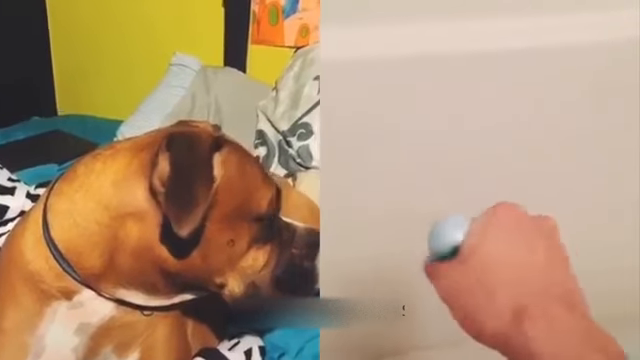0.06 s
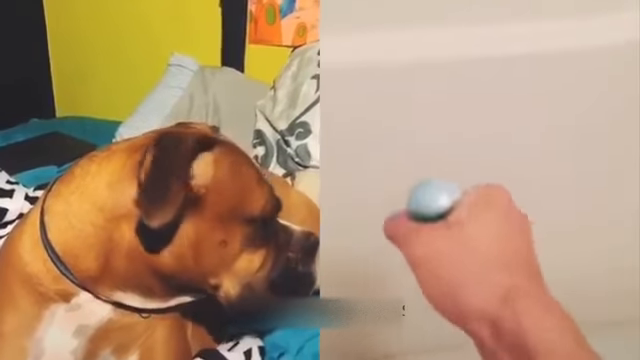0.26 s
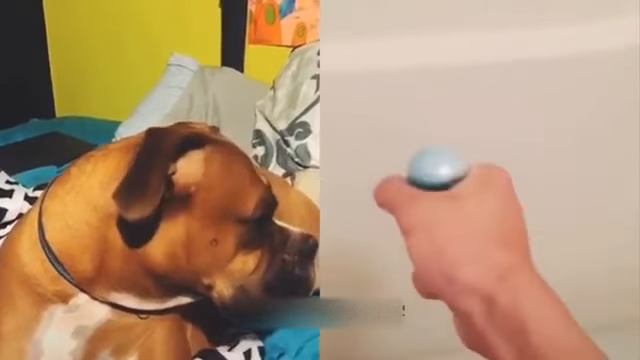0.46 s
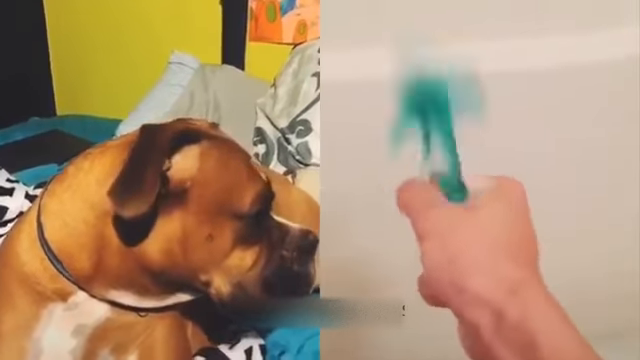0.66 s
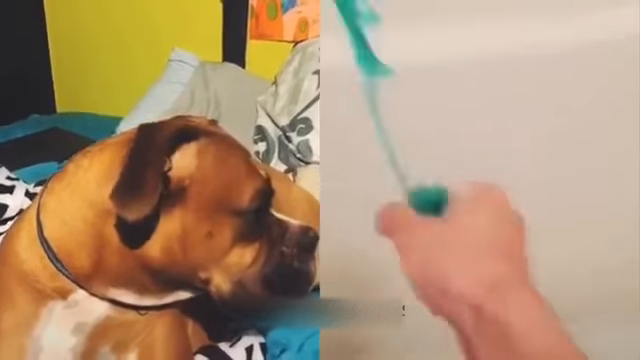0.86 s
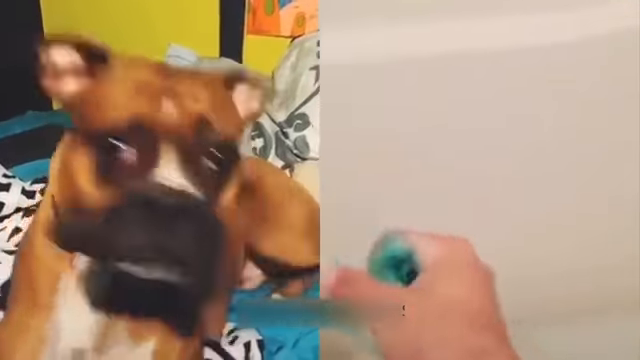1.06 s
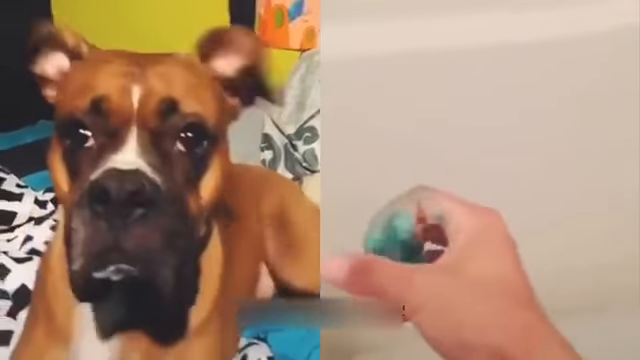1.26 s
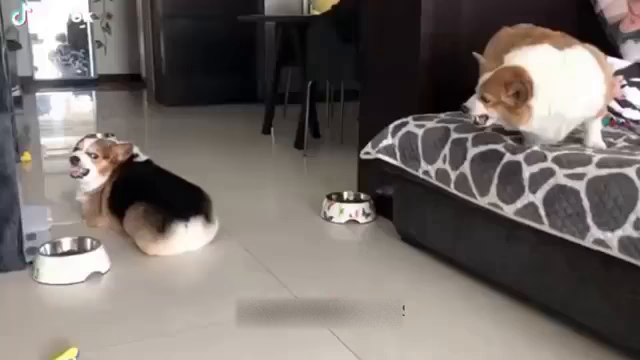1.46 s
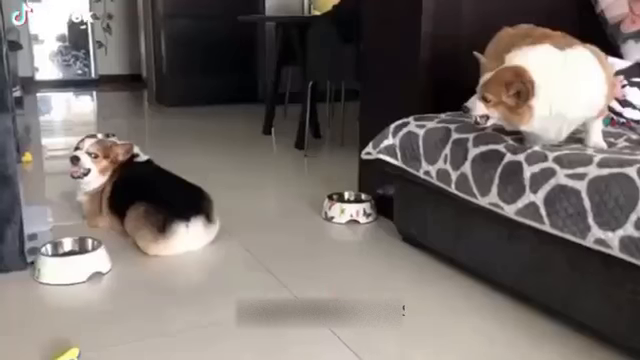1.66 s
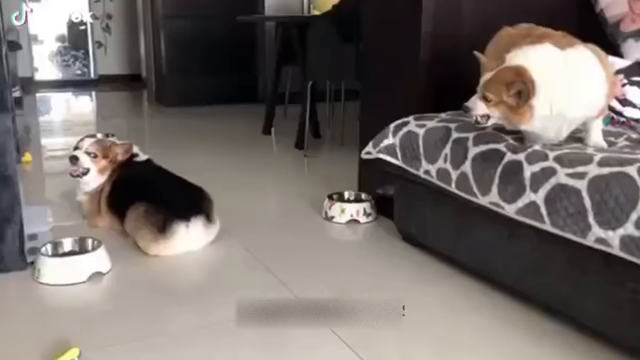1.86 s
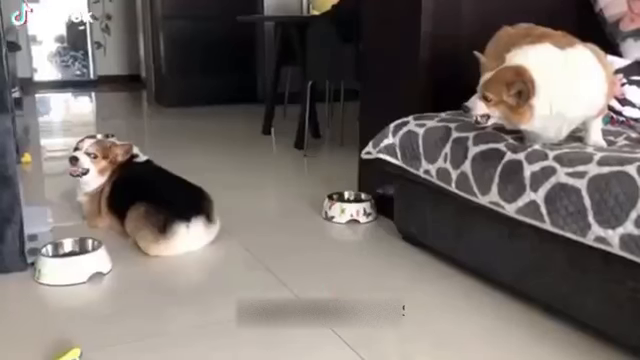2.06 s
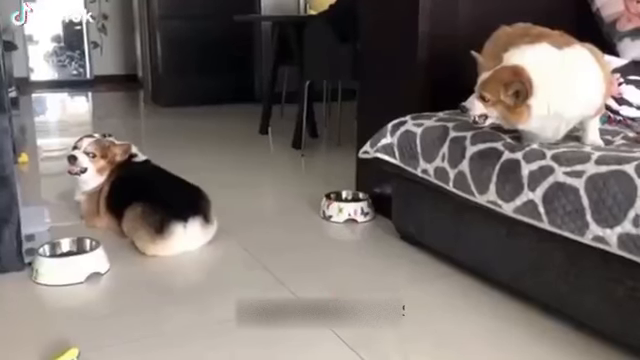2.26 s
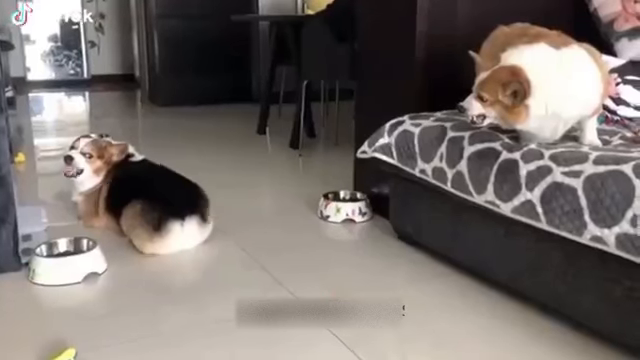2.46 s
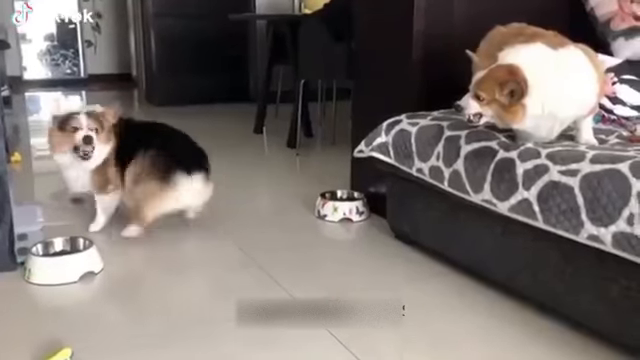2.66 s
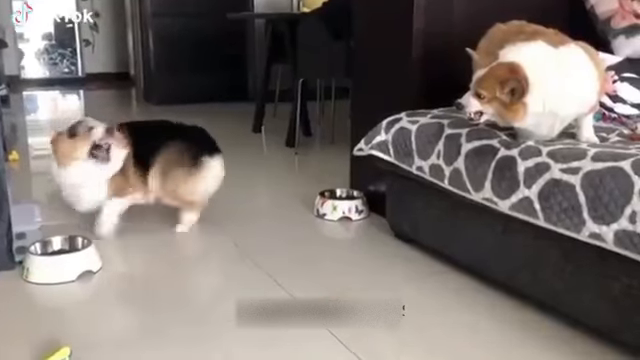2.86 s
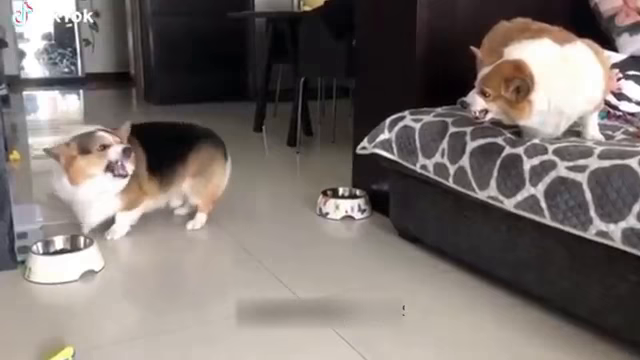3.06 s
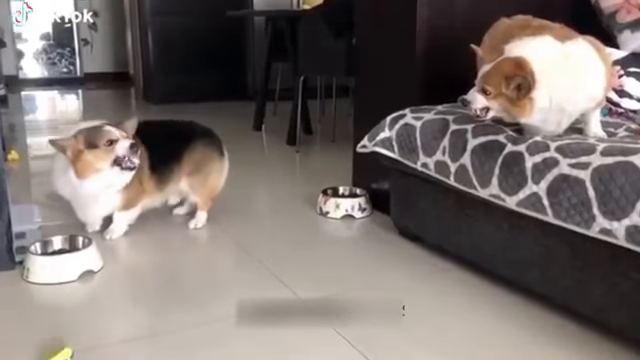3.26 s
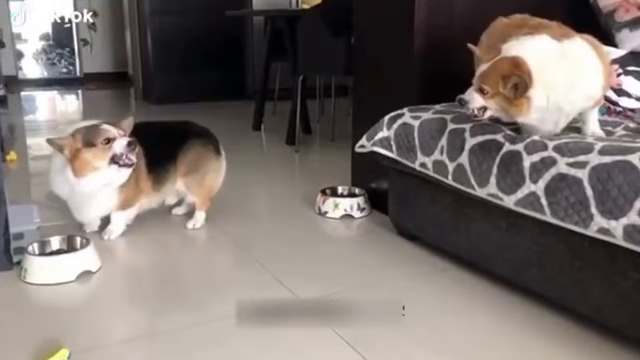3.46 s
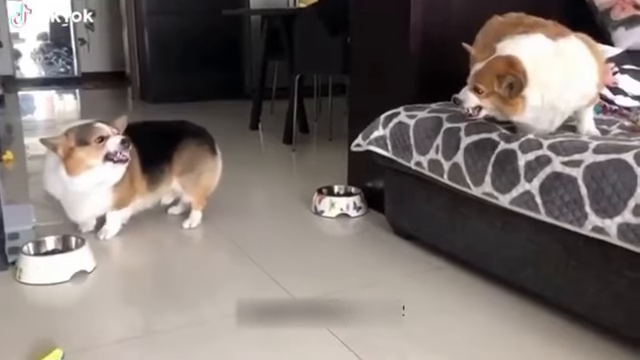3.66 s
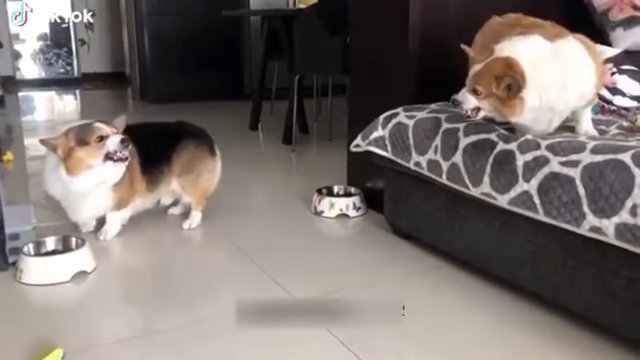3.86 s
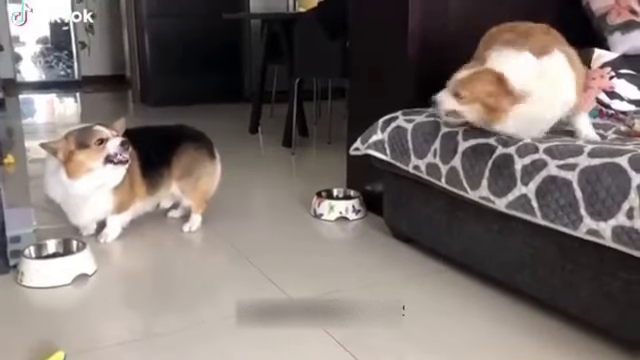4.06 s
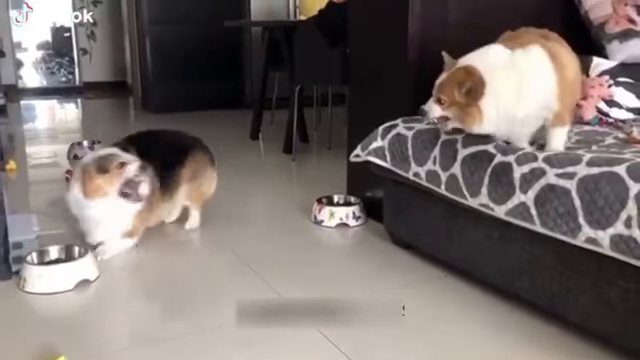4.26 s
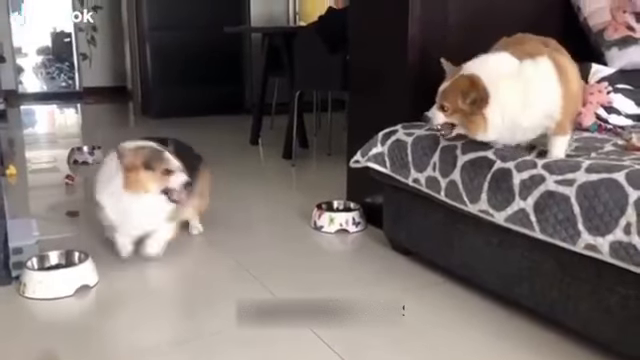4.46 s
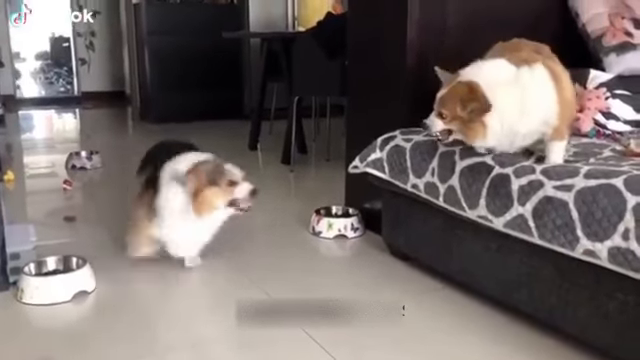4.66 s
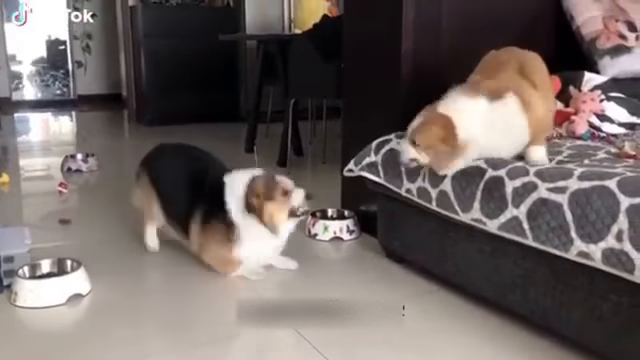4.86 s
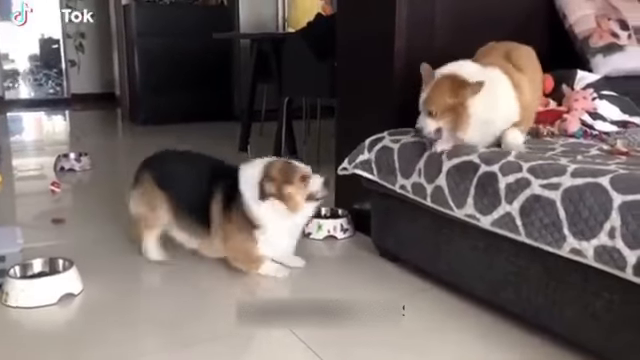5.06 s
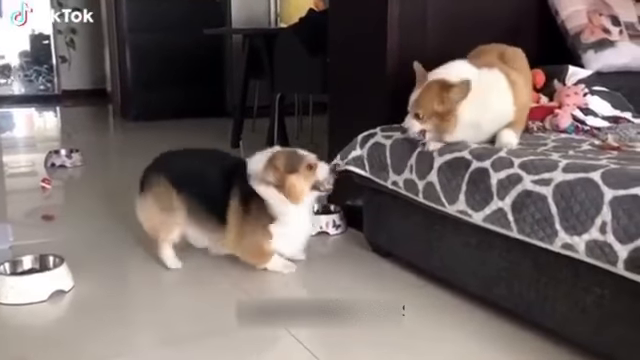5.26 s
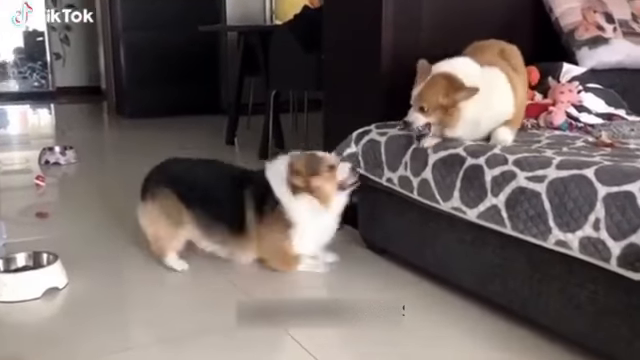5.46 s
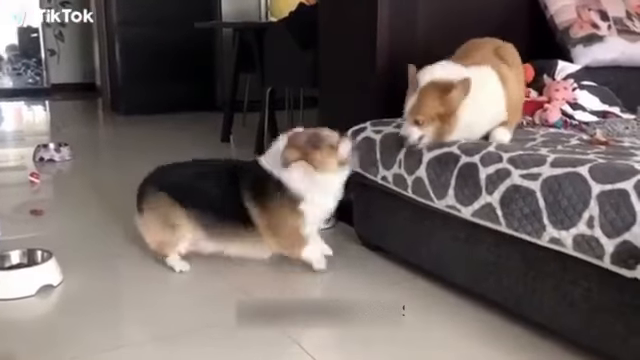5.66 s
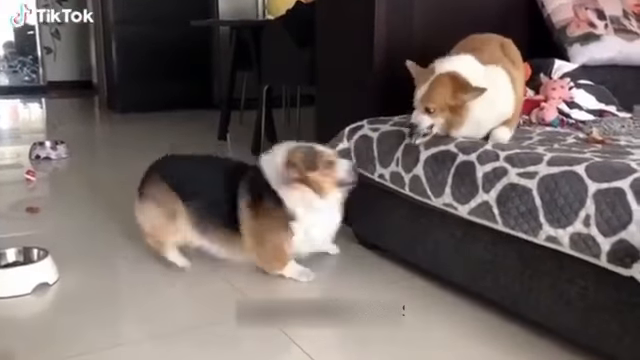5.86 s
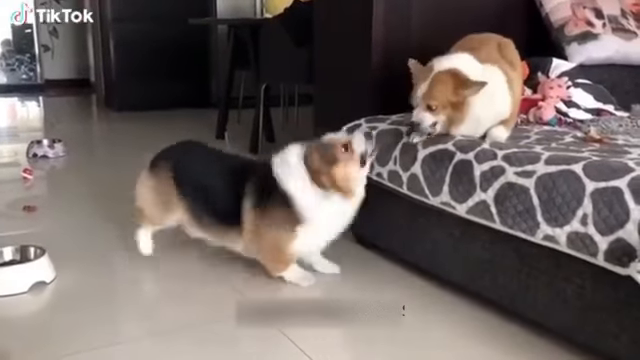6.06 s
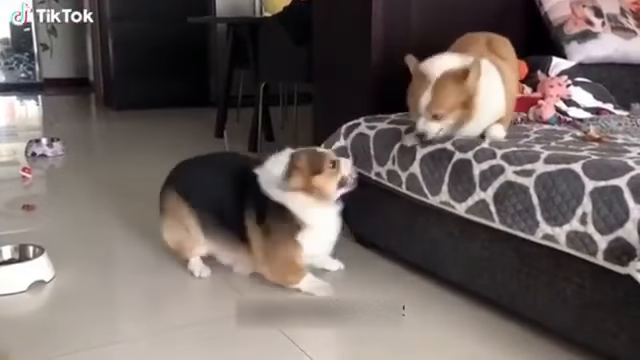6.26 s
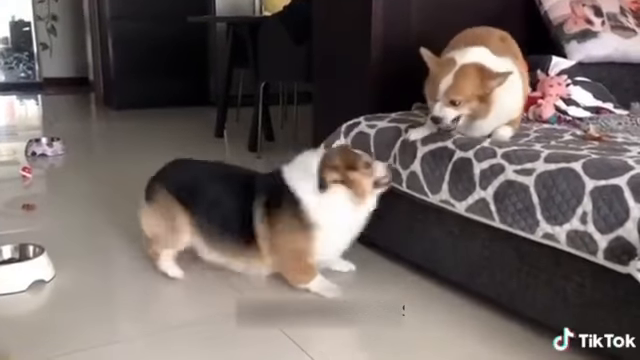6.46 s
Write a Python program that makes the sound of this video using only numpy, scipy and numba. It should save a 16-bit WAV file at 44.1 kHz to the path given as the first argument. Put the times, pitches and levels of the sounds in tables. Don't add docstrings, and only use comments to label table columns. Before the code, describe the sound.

Quiet room tone, a sharp rubbery pop, a brief silence, then steady throbbing growls with bursts of rough, quick barking between two small dogs indoors.

```python
import sys
import numpy as np
from scipy import signal
from scipy.fft import rfft, irfft
from scipy.io import wavfile
from scipy.ndimage import uniform_filter1d
from numba import njit

SR = 44100
rng = np.random.default_rng(int(sys.argv[2]) if len(sys.argv) > 2 else 0)


def ratio(d):
    e = np.asarray(d, float) / 20
    return 10 ** e


def transcribe(signal):
    frames = np.atleast_2d(signal).T
    limited = np.clip(frames, -1, 1)
    pcm = np.round(limited * 32767).astype(np.int16)
    wavfile.write(sys.argv[1], SR, pcm)


N = 287091
T = np.arange(N) / SR
POP_S = .9325


def noise():
    return rng.standard_normal(N)


def even(x, span_s=0.049):
    size = int(span_s * SR)
    power = uniform_filter1d(uniform_filter1d(x ** 2, size), size)
    return x / np.sqrt(power + 1e-12)


@njit
def svf(x, hz, width):
    y, band, low = np.empty(len(x)), 0., 0.
    for i in range(len(x)):
        g, k = np.tan(np.pi * hz[i] / SR), width / hz[i]
        v = (band + g * (x[i] - low)) / (1 + g * (g + k))
        band, low, y[i] = 2 * v - band, low + 2 * g * v, k * v
    return y


def ring(x, hz, width):
    hz = np.clip(hz + np.zeros(N), 10, .45 * SR)
    width = float(width)
    return svf(svf(x, hz, width), hz, width)


def modes(x, table):
    total = np.zeros(N)
    for k, (hz, width, db) in enumerate(table):
        total += (-1) ** k * ratio(db) * ring(x, hz, width) / np.sqrt(width)
    return even(total)


def colour(table):
    hz, db = np.transpose(table)
    bins = np.arange(N // 2 + 1) * SR / N + 1
    gain = ratio(np.interp(np.log(bins), np.log(hz), db))
    x = irfft(rfft(noise()) * gain, N)
    return x / x.std()


def fade(start_s, rise_s, t60_s):
    t = np.maximum(T - start_s, 0)
    return (1 - np.exp(-t / rise_s)) * np.exp(-np.log(1000) * t / t60_s)


def bedroom():
    # (frequency [Hz], level [dB])
    still_air = [(15, -22.5), (25, -6.5), (98, -3.5), (203, -8.5), (231, -14), (349, -6), (584, -16),
                 (665, -7.5), (2130, -18.5), (3380, -30), (12000, -55), (15600, -97.5), (22000, -120)]
    # (frequency [Hz], width [Hz], level [dB])
    ducts = [(354, 6.9, -8.5), (912, 92, -6), (1200, 47, -9.5), (2070, 51, -8.5), (2690, 72, -19.5),
             (2900, 37, -32)]
    # (resting gain [dB], dip [dB], recovery [s])
    ducking = [
        (6, -35, 0.52),
        (-5, -24, 0.164),
    ]
    t = np.maximum(T - POP_S, 0)
    low, high = (ratio(db + dip_db * np.minimum(t / .06, 1) * np.exp(-t / back_s))
                 for db, dip_db, back_s in ducking)
    tone = ratio(-42) * (colour(still_air) + ratio(-5.5) * modes(noise(), ducts))
    bass = signal.sosfilt(signal.butter(1, 300, fs=SR, output="sos"), tone)
    return low * bass + high * (tone - bass)


def toy():
    # (frequency [Hz], level [dB])
    tearing = [(180, -44), (300, -38), (475, -24), (629, -15), (917, -10), (1030, -15.5), (1250, -9.5),
               (1860, -11), (4090, -0.5), (5980, -13), (12300, -18.5), (15200, -41.5)]
    creak = ratio(-37.0) * colour(tearing) * (T > .911) * (T < POP_S)
    whistle = ratio(-23.5) * even(ring(noise(), 3100, 300))
    whistle *= np.clip((T - .918) / 0.011, 0, 1) * (T < POP_S + .002)

    t = np.maximum(T - POP_S, 0)
    swing = -np.sin(2 * np.pi * (58 * t + 1.176 * (1 - np.exp(-t / 0.0029))))
    thump = ratio(10.0) * swing * fade(POP_S, 0.0064, 0.085)
    kick = ratio(-1.5) * np.sin(2 * np.pi * 175 * t) * fade(POP_S, 0.00067, 0.069)

    spray = ratio(-1.5) * colour(tearing)
    body = signal.sosfiltfilt(signal.butter(4, 6600, fs=SR, output="sos"), spray)
    spray = body * fade(POP_S, 0.00043, 0.24) + (spray - body) * fade(POP_S, .001, 0.16)
    tail = ratio(-29.5) * even(ring(noise(), 4070, 2400), .1)
    tail *= fade(POP_S, .05, 0.81) * np.clip((1.36 - T) / 0.11, 0, 1)

    rustle = ratio(-51.5) * even(ring(noise(), 5300, 6600), 0.085) * (T > 1.415)
    return creak + whistle + thump + kick + spray + tail + rustle


@njit
def folds(hz, rough, chance, jitter, shimmer):
    pulses, phase, p, k = np.zeros(len(hz) + 1), np.empty(len(hz)), 0., 0
    for i in range(len(hz)):
        step = hz[i] * np.exp(jitter * rough[i] * chance[k, 0]) / SR
        p += step
        if p >= 1:
            p, k = p - 1, k + 1
            size = np.exp(shimmer * rough[i] * chance[k, 1])
            pulses[i] += size * p / step
            pulses[i + 1] += size * (1 - p / step)
        phase[i] = p
    return pulses[:-1], phase


def voice(hz, rough, jitter, shimmer, air, second):
    stumble = np.exp(.05 * rough * even(ring(noise(), 25, 60), .3))
    pulses, phase = folds(hz * stumble, rough, rng.standard_normal((N // 40, 2)), jitter, shimmer)
    apart = 1.05 + .025 * even(ring(noise(), 12, 20), .3)
    other, _ = folds(hz * apart, rough, rng.standard_normal((N // 40, 2)), jitter, shimmer)
    steady_flow = (1 + second * apart) * hz / SR
    puff = np.exp(-phase) * noise()
    return even(pulses + second * other - steady_flow) + air * rough * even(puff)


def growl():
    # (time [s], chest level [dB], snarl [dB], teeth resonance [Hz])
    course = [(1.58, -38.5, 3.5, 2200), (1.65, -31, -2, 2230), (1.69, -36.5, 8.5, 2360),
              (1.76, -33, 0, 2400), (2.02, -33.5, -2.5, 2000), (2.09, -31.5, 4, 1870),
              (2.25, -33, 1.5, 2020), (2.5, -35.5, 3.5, 1900), (3.1, -40.5, 5, 2040),
              (3.59, -42.5, 3.5, 1850), (3.651, -36.5, 7, 1800), (3.8, -41, 6.5, 1950),
              (4.24, -32, 1, 1950), (4.55, -39, 14.5, 1960), (5.149, -35.5, 5, 1960), (5.4, -31, 4, 1970),
              (6.0, -33, 3.5, 1952), (6.51, -35, 0, 1951)]
    # (frequency [Hz], width [Hz], level [dB])
    chest_modes = [(115, 95, 0), (200, 102, 0), (285, 59, -2)]
    # (frequency [Hz], width [Hz], level [dB])
    throat_modes = [(500, 330, -3), (723, 210, -1), (920, 590, -1.5)]
    # (frequency [Hz], width [Hz], level [dB])
    hiss_modes = [(3220, 1000, -1.5), (4230, 2200, -10), (5600, 870, -4), (6920, 1200, -8.5)]
    time_s, *columns = np.transpose(course)
    db, snarl_db, teeth_hz = (np.interp(T, time_s, column) for column in columns)

    source = voice(np.full(N, 96.), np.ones(N), jitter=.25, shimmer=.45, air=.8, second=.3)
    air = noise()
    throb = ratio(0.67 * even(ring(noise(), 19.7, 6.1), 0.38))
    chest = throb * modes(source, chest_modes)
    throat = ratio(-7 + 0.98 * snarl_db) * throb * modes(air + .6 * source, throat_modes)
    teeth = even(ring(air, teeth_hz, 680) + 0.26 * ring(air, 2580, 1200), .1)
    teeth *= ratio(-15 + 1.18 * snarl_db)
    hiss = ratio(-24.5 + 1.13 * snarl_db) * modes(air, hiss_modes)
    return ratio(db - 1.5) * (chest + throat + teeth + hiss)


def pushes(table, fall_db_s, rise_db_s=1600.5):
    slur_s, foot_db, foot_db_s = .012, -16.5, 450.5
    start_s, hold_s, peak_db, *columns = np.transpose(table)
    level = np.full(N, -70.)
    for start, hold, peak in zip(start_s, hold_s, peak_db):
        foot = foot_db_s * np.abs(start - T) - foot_db
        attack = np.clip(rise_db_s * (start - T), 0, foot)
        release = np.maximum(fall_db_s * (T - start - hold), 0)
        level = np.maximum(level, peak - attack - release)
    row = np.clip(np.searchsorted(start_s - slur_s, T) - 1, 0, None)
    age = np.clip(T - start_s[row], 0, .15)

    def slur(x):
        return uniform_filter1d(x, int(slur_s * SR))

    return level, slur(age), [slur(column[row]) for column in columns]


def barks():
    # (full strength [s], hold [s], level [dB], fold pitch [Hz], throat resonance [Hz])
    throat_pushes = [(2.533, .085, -7, 854.5, 775), (2.63, .095, -9, 285, 657),
                     (2.815, 0.022, -17.5, 319, 907), (2.85, 0.038, -16, 455.7, 857),
                     (2.92, .06, -12, 271, 805), (4.066, .028, -3, 516.2, 1016),
                     (4.112, .035, -7.5, 354.6, 770), (4.293, 0.12, -11, 770, 740),
                     (4.41, .05, -7, 304.9, 763), (4.76, .08, -30.5, 229.6, 852),
                     (4.872, .016, -0.5, 536.3, 1070), (4.908, .012, -10, 548, 1000),
                     (4.96, .09, -25, 399.6, 920), (5.25, 0.05, -16.5, 398.2, 1082),
                     (5.305, 0.119, -24, 456, 750), (5.472, 0.039, -19, 419, 930),
                     (5.617, .008, -5, 525.4, 1010), (5.648, .06, -19, 300.9, 800),
                     (5.772, .25, -28.5, 250.6, 730), (6.075, .04, -11, 460, 916),
                     (6.158, 0.0073, -12, 456.2, 936), (6.2, 0.088, -22, 330, 890),
                     (6.36, .02, -28.5, 281.7, 900), (6.465, .05, -25, 263, 930)]
    # (full strength [s], hold [s], level [dB], mouth resonance [Hz])
    gapes = [(2.54, 0.029, -7, 1810), (2.575, 0.13, -9, 1482), (2.73, 0.063, -23, 1280),
             (2.843, .012, -4.5, 1500), (2.868, .012, -5, 1400), (2.9, 0.012, -7, 1380),
             (2.96, 0.017, -29.5, 1416), (4.065, 0.028, -13, 1200), (4.112, 0.023, -9, 1470),
             (4.16, 0.052, -24, 1348), (4.305, .045, -4.5, 1500), (4.37, 0.086, -10, 1577),
             (4.84, 0.019, -26, 1547), (4.875, .02, -9.5, 1257), (4.928, 0.017, -11, 1464),
             (4.97, 0.11, -24, 1530), (5.25, .015, -4, 1400), (5.285, .01, -9, 1550),
             (5.31, .025, -16, 1830), (5.455, .015, -10, 1600), (5.5, .04, -19, 1890),
             (5.614, .012, -17, 1257), (5.66, 0.039, -21, 1702), (5.785, 0.077, -23, 1690),
             (6.057, .023, -2, 1358), (6.118, .038, -6, 2000), (6.17, 0.028, -15.5, 1593),
             (6.22, .08, -20.5, 1750), (6.46, 0.036, -30.5, 1840)]
    # (time [s], hold [s], level [dB], pitch [Hz])
    wheezes = [
        (2.826, 0.0074, -24, 3500),
        (4.31, .01, -24.5, 3220),
        (5.465, .01, -21, 2450),
        (5.772, .028, -24, 3450),
        (5.858, 0.0074, -34, 3750),
        (6.455, .01, -32, 2499),
    ]
    # (time [s], hold [s], level [dB], rasp resonance [Hz])
    rasps = [(2.535, .06, -20.5, 3020), (2.63, 0.076, -27.5, 3020), (2.77, 0.044, -33.5, 2960),
             (2.845, 0.022, -27, 3470), (2.91, .01, -33.5, 3640), (2.98, 0.042, -46.5, 3900),
             (3.13, .25, -52, 3820), (4.06, 0.024, -24, 2990), (4.115, .02, -25, 2900),
             (4.17, 0.07, -36, 2970), (4.29, 0.053, -21, 3490), (4.38, 0.078, -27.5, 3640),
             (4.56, 0.12, -42, 3600), (4.84, .01, -28.5, 3820), (4.87, 0.069, -26, 3300),
             (4.98, .12, -31.5, 3540), (5.17, .05, -34, 3570), (5.255, 0.015, -21.5, 3046),
             (5.3, .05, -27.5, 3260), (5.47, 0.036, -26, 2900), (5.628, .005, -24.5, 3600),
             (5.66, 0.033, -29.5, 3804), (5.78, 0.085, -28, 3530), (5.93, .005, -34, 3610),
             (6.03, 0.0051, -35, 3600), (6.06, 0.075, -23, 3230), (6.15, 0.13, -27, 3110),
             (6.29, .04, -34, 3096), (6.445, .06, -34.5, 3050)]
    # (frequency [Hz], width [Hz], level [dB])
    teeth_modes = [(2864, 1040, 2), (4350, 3400, -2.5), (6310, 3000, 1.5)]
    # (from [s], added roughness [share])
    hoarseness = [(2.53, 0.19), (2.84, -.2), (2.918, -.25), (4.06, 0.043), (4.11, .2), (4.3, -0.0021),
                  (4.41, 0.19), (4.87, -0.0083), (5.25, 0), (5.31, .2), (5.46, 0.16), (5.62, 0),
                  (6.05, 0.091), (6.11, -0.097), (6.22, 0.046)]
    # (time [s], hold [s], level [dB])
    grunts = [
        (2.54, 0.014, -21),
        (2.68, 0.031, -30),
        (2.87, 0.05, -24),
        (4.12, 0.046, -17.5),
        (4.42, 0.028, -28),
        (5.3, 0.029, -20),
        (5.5, .04, -20.5),
        (5.67, 0.033, -21),
        (6.15, 0.012, -15.5),
        (6.285, 0.016, -16),
    ]
    db, age, (hz, throat_hz) = pushes(throat_pushes, 800)
    mouth_db, open_s, (mouth_hz,) = pushes(gapes, 799.5)
    wheeze_db, _, (wheeze_hz,) = pushes(wheezes, 1198)
    rasp_db, _, (rasp_hz,) = pushes(rasps, 295.5, 600)
    grunt_db, _, _ = pushes(grunts, 400)

    effort = np.maximum(db, mouth_db)
    from_s, added = np.transpose(hoarseness)
    hoarse = added[np.clip(np.searchsorted(from_s, T) - 1, 0, None)]
    rough = np.clip(.75 - .013 * (effort + 35) + hoarse, .1, .9)
    hz = hz * (1 - .5 * age)
    throat_hz = throat_hz * (1 - 0.38 * age)
    mouth_hz = mouth_hz * (1 + .3 * open_s)
    source = voice(hz, rough, jitter=.2, shimmer=.9, air=.8, second=.6)
    air = source + 1.95 * noise()

    awake = np.clip((effort + 60) / 15, 0, 1)
    chest_gain = awake * ratio(-23.5 + 0.67 * effort) + ratio(grunt_db - 6)
    chest = chest_gain * even(ring(source + .5 * air, 340, 460))
    throat = ring(source, throat_hz, 370) + 1.84 * rough ** 2 * ring(source, 0.82 * throat_hz, 545)
    mouth = ring(source, mouth_hz, 350) + 0.66 * ring(source, mouth_hz, 1100)
    mouth -= 0.42 * ring(source, 2390, 1001)
    muzzle = signal.ellip(3, 1, 30, (415, 2840), "bandpass", fs=SR, output="sos")
    tone = signal.sosfilt(muzzle, ratio(db) * even(throat) - ratio(mouth_db) * even(mouth))

    patches_db = 2.5 * even(ring(noise(), 45, 60), .3)
    rasp = 0.66 * even(ring(air, rasp_hz, 700)) + 1.095 * modes(air, teeth_modes)
    rasp *= ratio(rasp_db - 3 + patches_db)
    wheeze = ratio(wheeze_db) * even(ring(air, wheeze_hz, 700))
    flutter = ratio(1.9 * even(ring(noise(), 35.86, 14.0), 0.43))
    return flutter * (tone + rasp + wheeze) - chest


def snaps():
    # (time [s], peak level [dB], pitch [Hz])
    knocks = [
        (4.835, -9, 1175),
        (5.22, 5.5, 1400),
        (5.458, -15, 1651),
    ]
    return sum(ratio(db) * np.sin(2 * np.pi * hz * (T - s)) * fade(s, 0.0008, .013) for s, db, hz in knocks)


def echoes(x):
    # (delay [s], level [dB])
    reflections = [(.0031, -9.5), (.0074, -7), (.0127, -6), (.0193, -10)]
    out = x.copy()
    for k, (delay_s, db) in enumerate(reflections):
        out += (-1) ** k * ratio(db) * np.roll(x, int(delay_s * SR))
    return out


@njit
def walls(x, lags, gain, damp):
    line, soft, out = np.zeros((8, 4096)), np.zeros(8), np.zeros(len(x))
    for i in range(len(x)):
        total = 0.
        for k in range(8):
            soft[k] += (1 - damp) * (gain[k] * line[k, (i - lags[k]) & 4095] - soft[k])
            total += soft[k]
            out[i] += soft[k] * (1 - 2 * (k % 2))
        for k in range(8):
            line[k, i & 4095] = x[i] + soft[k] - total / 4
    return out


def tiled_room():
    dogs = barks() + snaps()
    lags = np.array([487, 631, 797, 983, 1153, 1327, 1549, 1801])
    t60_s = 0.6
    reverb = walls(dogs, lags, ratio(-60 * lags / SR / t60_s), 0.071)
    mix = ratio(-3.5) * echoes(dogs) + ratio(-19) * reverb + growl()
    return signal.sosfilt(signal.ellip(8, .3, 70, 7700, fs=SR, output="sos"), mix)


def scene():
    cut_s, back_s = 1.458, 1.578
    before = (bedroom() + toy()) * (T < cut_s)
    after = tiled_room() * np.clip((T - back_s) / 0.015, 0, 1)
    return (before + after)[None]


def low_pass(x):
    return signal.sosfilt(signal.butter(12, 15400, fs=SR, output="sos"), x)


def record(dry):
    squashed = np.clip(dry - .04 * np.clip(dry, -1, 1) ** 5, -.96, .96)
    mix = signal.sosfiltfilt(signal.butter(4, 14500, fs=SR, output="sos"), squashed)
    return low_pass(mix)


dry = scene()
out = record(dry)
transcribe(out)
```